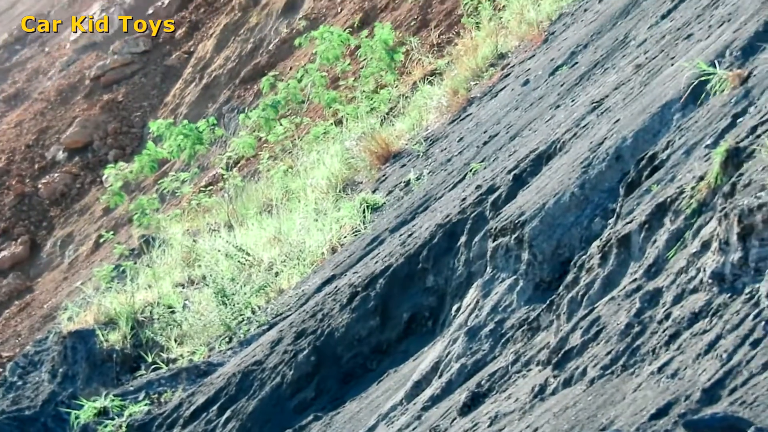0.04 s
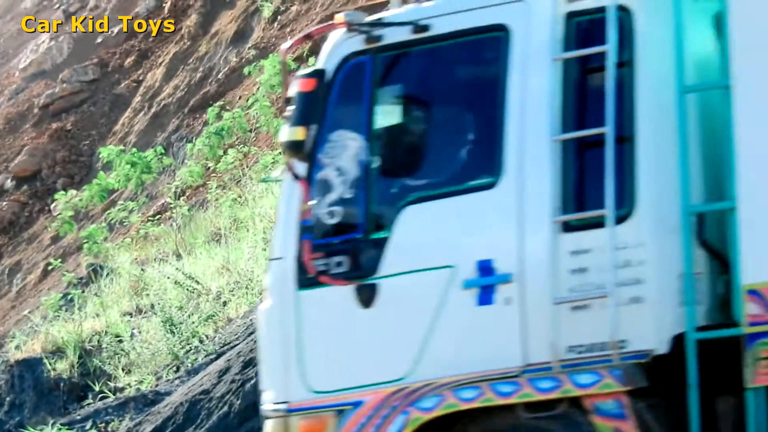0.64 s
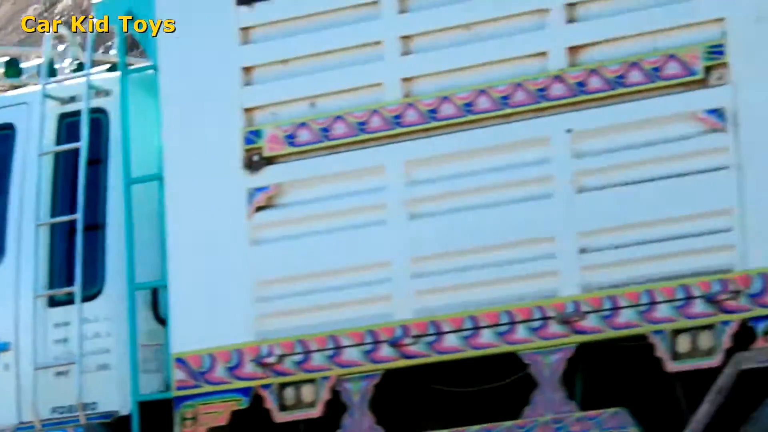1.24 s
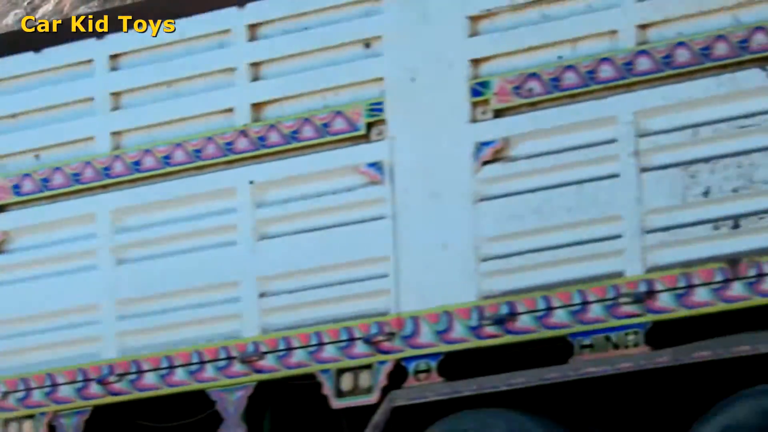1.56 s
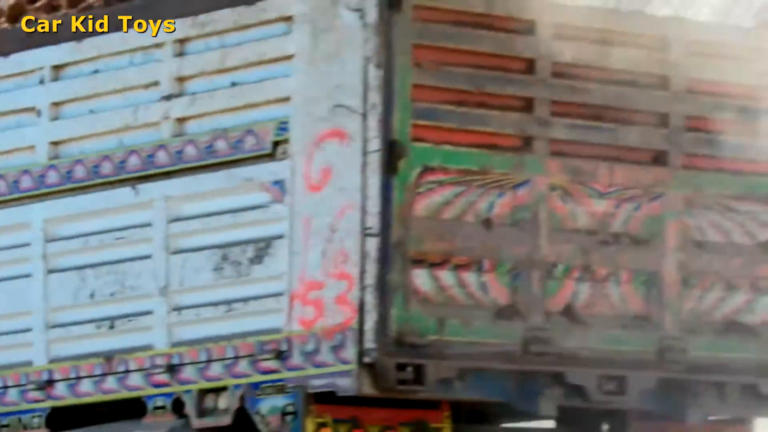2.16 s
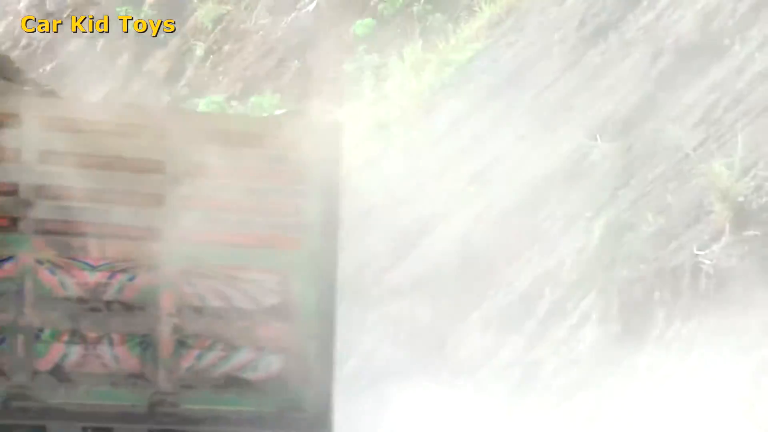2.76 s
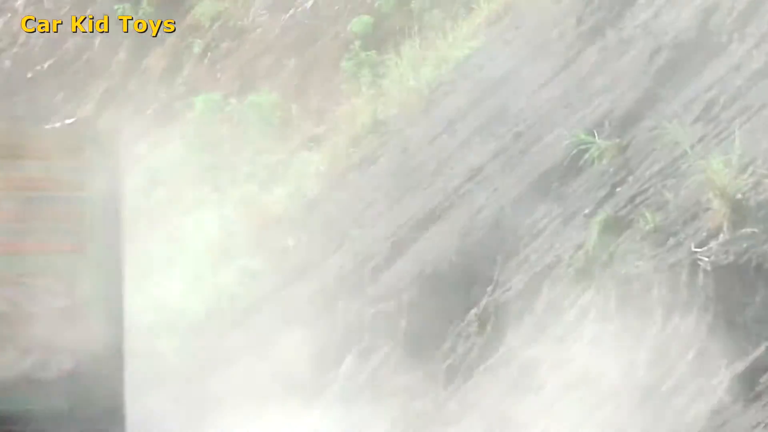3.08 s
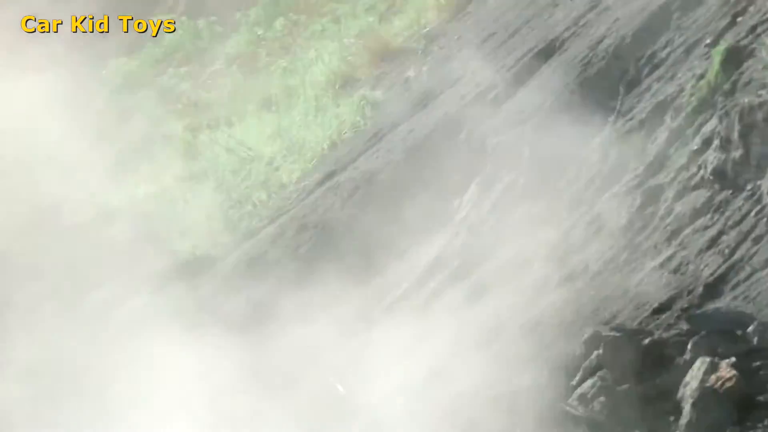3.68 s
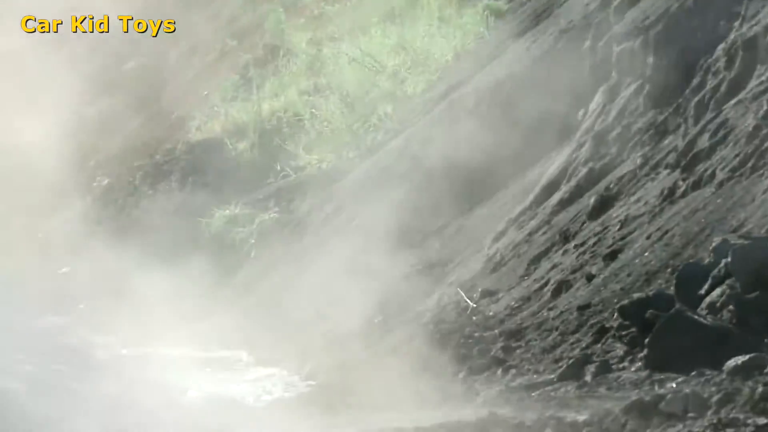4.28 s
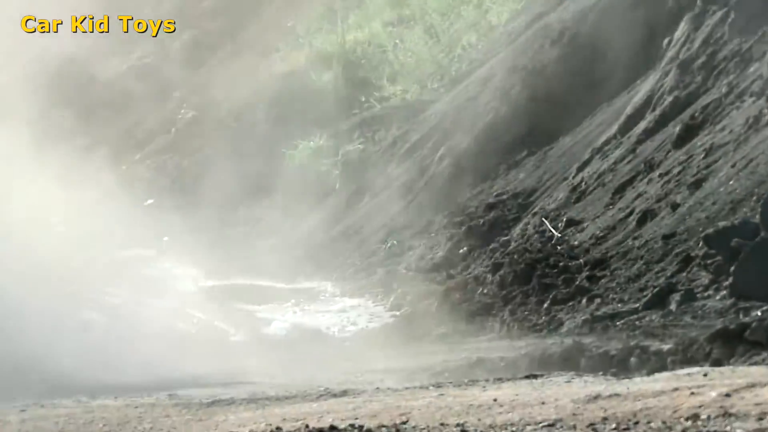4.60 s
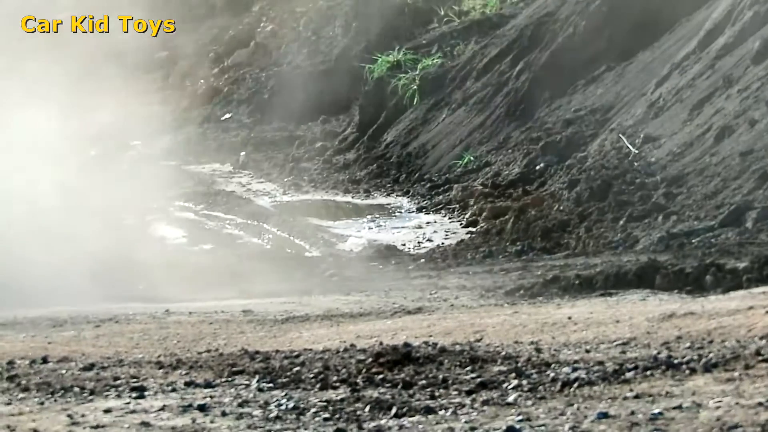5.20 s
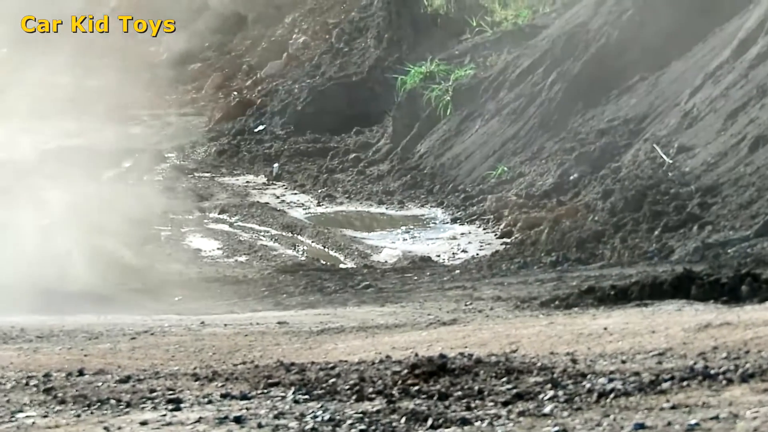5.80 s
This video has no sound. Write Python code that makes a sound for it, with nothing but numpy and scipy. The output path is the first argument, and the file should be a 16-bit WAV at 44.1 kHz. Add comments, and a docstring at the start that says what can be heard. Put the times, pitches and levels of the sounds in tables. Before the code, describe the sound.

Wind thumps the microphone as a big truck drones by over stones and grit, its body rattling, before receding with faintly squealing brakes.

```python
"""Rough earth road: a heavy diesel truck passes close by, its cargo body clanking over the ruts.
Firings ring the exhaust pipe, tyres crush stones and grit, loose parts tap the chassis.
Gusts buffet two microphone ports; the hardest thumps push a limiter down, and it recovers slowly.
As the truck draws away its tailpipe faces the listener; dry springs squeak, the engine sags and
picks up, the brake drums sing thinly."""
import sys
import numpy as np
from scipy import signal
from scipy.fft import rfft, irfft
from scipy.io import wavfile
from scipy.ndimage import uniform_filter1d, minimum_filter1d

SR = 44100
rng = np.random.default_rng(int(sys.argv[2]) if len(sys.argv) > 2 else 0)


def store_pcm(level_fs):
    """Save levels as 16-bit WAV."""
    pcm = np.round(np.clip(level_fs, -1, 1) * 32767).astype(np.int16)
    wavfile.write(sys.argv[1], SR, np.atleast_2d(pcm).T)


N = 257544
T = np.arange(N) / SR
HZ = np.fft.rfftfreq(N, 1 / SR)
TRUCK_SIDE_DB = -0.3  # side: left minus right

# Engine run. Each row: time in seconds, firing rate in Hz, throttle in dB.
ENGINE_RUN = [(0.0, 68.46, -2), (0.41, 70.63, 0.5), (0.71, 68.3, -1), (0.86, 62.28, 4), (1.2, 75.4, -1.5),
              (2.05, 71.46, -1), (2.39, 78, 1), (2.55, 76, -3), (2.85, 78.9, 0), (3.15, 77.6, -1),
              (3.4, 74.83, 0), (3.6, 75.48, 1.5), (3.85, 77.97, 0.5), (4.1, 80.7, -2.5), (4.5, 81.06, -2.5),
              (4.88, 80.34, 0.5), (5.04, 74.7, 0), (5.16, 63.55, -3), (5.32, 59.99, -1), (5.5, 65.15, 1),
              (5.62, 69.6, -0.5), (5.84, 74.3, 0)]
# Exhaust orders; the sixths come from unequal cylinders.
# Each row: multiple of the firing rate, level in dB, change under load in dB.
EXHAUST_ORDERS = [(4 / 6, -27, 0), (1, 0, -1.096), (8 / 6, -12.5, -2), (10 / 6, -18.5, 0),
                  (11 / 6, -12.5, -2.4), (2, -4, 0.9), (13 / 6, -13.5, -1), (15 / 6, -25, 0),
                  (16 / 6, -19.5, 0), (2.7, -24.5, 0), (20 / 6, -24, -3)]
# Exhaust pipe resonances. Each row: frequency in Hz, width in Hz, gain in dB.
PIPE_MODES = [(166.8, 35, 0.5), (255.4, 28.4, -2), (340, 60, -7.5), (480, 100, -16)]
# Exhaust rumble. Each row: frequency in Hz, relative density in dB.
RUMBLE_SPECTRUM = [(20, -42), (45, -15), (70, -0.5), (130, 10), (180, 4.5), (250, -3), (400, -20.5),
                   (800, -57), (2000, -43)]
# Engine block clatter. Each row: frequency in Hz, relative density in dB.
CLATTER_SPECTRUM = [(100, -8.5), (250, 8), (400, -0.5), (600, -7), (780, -1), (950, -1.5), (1150, -6),
                    (1400, -16), (2000, -13), (4000, -39), (12000, -76)]
# Stones under the tyres. Each row: frequency in Hz, relative density in dB.
STONE_SPECTRUM = [(300, 1.5), (480, 6.5), (600, 3.5), (1050, -4), (1380, 4), (1900, -2.5), (2400, -2),
                  (3000, -7), (3700, -14.5), (6000, -18), (12000, -73)]
# Fine grit under the tyres. Each row: frequency in Hz, relative density in dB.
GRIT_SPECTRUM = [(500, -17), (2000, 1), (3200, -4), (4000, -2.5), (5200, -0.5), (7000, -2), (8300, 2),
                 (9400, 1.5), (10200, -5.5), (11200, -12), (12000, -35), (14000, -36), (15500, -55)]
# Loose gravel. Each row: middle in seconds, length in seconds, grit change in dB, stone change in dB.
GRAVEL_PATCHES = [(0.316, 0.084, 5.5, 3), (0.58, 0.11, 5, 1.8), (0.761, 0.025, 4.5, -2),
                  (1.012, 0.13, 7, -5), (1.455, 0.11, 4.5, 6.5), (3.786, 0.3, 1, 5), (4.18, 0.28, 0.5, 1),
                  (5.18, 0.021, 6, 2), (5.704, 0.21, 7.5, -5)]
# Wind rumble. Each row: frequency in Hz, relative density in dB.
WIND_SPECTRUM = [(15, -37), (35, -11), (70, -3), (115, 0.5), (160, -1.5), (210, -6.5), (280, -23),
                 (520, -37.5), (800, -60), (2000, -70), (8000, -84)]
# Flapping of strong wind lumps. Each row: frequency in Hz, relative density in dB.
FLAP_SPECTRUM = [(100, -13), (220, 3), (330, 6.5), (500, -6.5), (800, -18.5), (2000, -38), (8000, -76)]
# Gusts at the ports. Each row: start in seconds, length in seconds, level in dB, side in dB.
PORT_GUSTS = [(0.042, 0.045, -22, -15), (0.286, 0.15, -15, 5), (0.491, 0.067, -15.5, -1),
              (0.655, 0.46, -18.5, -0.5), (1.1, 0.37, -15, 1.5), (1.499, 0.096, -14, 0.5),
              (1.714, 0.053, -14, -0.5), (1.842, 0.038, -15.5, -10), (2.028, 0.15, -15, 19),
              (2.426, 0.089, -16, -2.5), (2.59, 0.2, -29.5, 9), (3.6, 0.24, -30, 2),
              (3.871, 0.17, -17, -1.5), (4.082, 0.16, -18, 4.5), (4.34, 0.12, -25, 9),
              (5.66, 0.035, -16.5, 8)]
# Eddies striking a port. Each row: time in seconds, swing in dB, tip crack in dB, pitch in Hz, side in dB.
EDDY_STRIKES = [(.069, -1.5, -30, 161, 35), (.334, -6.5, -34, 159, -8), (0.551, -0.5, -19, 133, 30),
                (0.832, -2, -33, 143, -18), (.869, -1, -2, 146, -28), (.92, 0, -30, 160, 8),
                (1.009, -1, -23, 156, 8), (1.353, 1, -36, 119, 11), (1.377, 3.5, -28, 117, -21),
                (1.478, 0, -19, 168, 26), (1.531, -3.5, -2.5, 172, 8.5), (1.612, -0.5, -11, 144, 40),
                (1.92, 0, 0.5, 140.9, -6.5), (2.042, -2.5, -28, 180.3, -17), (2.083, 4.5, 5.5, 192, -13),
                (2.501, -5, -36.5, 127.9, 4), (2.592, -2, -36, 148, -32), (4.01, -3.5, -30, 184, 29),
                (4.12, -0.5, -27, 143, 30), (4.191, -8.5, -43, 125.5, -4), (4.435, -1.5, -1, 166, 38),
                (5.687, 2, -35, 136.9, 9)]
# Cargo body clanks. Each row: start in seconds, rattle level in dB, rattle lag in seconds,
# knock level in dB, knock pitch ratio, rattle T60 in seconds, side in dB.
BODY_CLANKS = [(0.366, -19, 0.0086, -19.5, 0.96, 0.088, -4),
               (1.29, -24.5, 0.0092, -22.5, 0.88, 0.093, -1.5),
               (1.71, -24.5, 0.009, -24.5, 0.87, 0.096, -1), (2.383, -26, 0.011, -37, 0.99, 0.072, -0.5)]
# Latch knock. Each row: delay in seconds, base frequency in Hz, width in Hz, gain in dB.
LATCH_MODES = [(0, 3240, 334, -1), (.002, 1740, 303, -1.5), (.005, 840, 250, -29)]
# Steel clashing on steel. Each row: frequency in Hz, relative density in dB.
CLASH_SPECTRUM = [(700, -18), (1400, -0.5), (3000, -4.5), (3700, -4.5), (5000, 0.5), (7000, -2),
                  (9500, 0.5), (11000, -5), (13200, -16.5), (14500, -36)]
# Loose steel fittings. Each row: frequency in Hz, width in Hz, gain in dB.
STEEL_MODES = [(1420, 90, 4), (1680, 150, 2), (2210, 43, 11.5), (2540, 50, 2), (3075, 29, 15.5),
               (4220, 60, 9.5), (4440, 39, 7), (4890, 50, 3.5), (5140, 54, 5), (5550, 65, 2),
               (6670, 55, 8.5), (7920, 58, 6), (8870, 100, 4), (9750, 170, 2), (10900, 140, -10)]
# Jolts over ruts. Each row: start in seconds, level in dB, plank pitch in Hz.
RUT_JOLTS = [(0.15, -36, 715), (0.335, -32, 614), (0.445, -40, 689), (0.55, -25, 433), (0.826, -36, 480),
             (1.008, -15.5, 407), (1.104, -26, 390), (1.43, -33, 327), (1.522, -29, 409),
             (1.848, -33, 956.5), (1.879, -38, 603), (2.165, -27, 329.4), (2.534, -37, 1000),
             (2.755, -37, 745), (3.785, -32.5, 920), (4.007, -22.5, 340), (4.032, -38, 814),
             (4.117, -30, 400), (5.228, -38, 1180)]
# Spring squeaks. Each row: start in seconds, length in seconds, start, peak and end pitch in Hz,
# level in dB, roughness as a fraction of pitch, relative octave level in dB.
SPRING_SQUEAKS = [(1.668, 0.092, 3910, 3720, 3600, -38.5, 0.028, 2),
                  (2.716, 0.061, 3280, 3820, 3840, -32, 0.02, -14),
                  (5.033, 0.1, 3870, 3700, 3487, -51, 0.015, 5.5)]
# Scrape of the spring leaves. Each row: frequency in Hz, relative density in dB.
SCRAPE_SPECTRUM = [(600, -20), (1600, 2), (3000, -10), (5000, -14), (10000, -25)]
# Spells of one brake drum mode. Each row: start in seconds, end in seconds, pitch in Hz, level in dB.
DRUM_SQUEALS = [(2.95, 3.553, 623, -42.5), (4.336, 4.574, 5870, -52), (4.9, 5.124, 5860, -52.5),
                (5.414, 5.492, 2790, -39), (5.475, 5.618, 2800, -41.5), (5.628, 5.721, 2800, -40),
                (5.434, 5.544, 4420, -41), (5.417, 5.509, 4130, -51), (5.45, 5.53, 5507, -51),
                (5.497, 5.56, 8100, -49), (5.537, 5.614, 6250, -40), (5.621, 5.78, 6270, -40),
                (5.62, 5.71, 7200, -47), (5.73, 5.82, 3390, -45.5), (5.73, 5.8, 8020, -52),
                (5.775, 5.89, 6035, -42), (5.813, 5.89, 2430, -36.5)]
# Rattling chassis parts. Each row: frequency in Hz, width in Hz, relative level in dB.
CHASSIS_MODES = [(519, 33, 3), (633, 33, 5), (714, 66, -1), (954, 31, 0), (1316, 57, -1.5), (1576, 60, -3),
                 (2290, 53, -6.5), (2973, 36, -9)]
# Likeness of the two ports. Each row: frequency in Hz, left-right correlation.
PORT_CORRELATION = [(60, 0.99), (350, 0.6), (900, 0.87), (2300, 0.78), (4200, 0.63), (8000, 0.53),
                    (14000, 0.14)]


def engine(jitter=0.012, uneven_db=4.0, rumble_db=-15, stumble_db=2.0,
           front_db=-26, rear_db=-20, tail_passes_s=2.42, tail_swing_s=1):
    """Exhaust drone, puffs and rumble, louder as the tailpipe swings round, plus block clatter."""
    firing_hz, throttle_db = curves(ENGINE_RUN)
    rear = (1 + np.tanh((T - tail_passes_s) / tail_swing_s)) / 2
    exhaust_db = front_db + (rear_db - front_db) * rear + throttle_db
    firings = np.cumsum(firing_hz * (1 + jitter * wander(27.4)[0])) / SR
    drone = 0
    for order, db, load_db in EXHAUST_ORDERS:
        sway_db = 0 if order == 1 else uneven_db
        order_db = db + load_db * braking() + sway_db * wander(9.0)
        drone = drone + amp(order_db) * np.cos(2 * np.pi * (order * firings + rng.random()))
    chug_db = (0.04 + 2.5 * braking()) * np.cos(2 * np.pi * firings / 3)  # every third firing is stronger
    chug = amp(chug_db + stumble_db * np.tanh(wander(62)[0]))
    rumble = colour(ports(noise()), RUMBLE_SPECTRUM)
    exhaust = unit(drone * chug) + puffs(firings) + amp(rumble_db) * rumble
    return amp(exhaust_db) * exhaust + clatter(firings)


def puffs(firings, level_db=-13.5, distance_share=0.46, uneven_db=3, gas_db=-4, gas_decay_firings=0.63):
    """Each firing rings the exhaust pipe with an uneven pulse and a rush of gas."""
    strength = amp(uneven_db * np.clip(rng.standard_normal(N), -2, 2))
    pulses = np.diff(np.floor(firings), prepend=0) * strength
    gas = rng.standard_normal(N) * np.exp(-(firings % 1) / gas_decay_firings)
    drive = unit(pulses) + amp(gas_db) * unit(gas)
    pipe = sum(amp(db) * resonance(hz, width_hz) for hz, width_hz, db in PIPE_MODES)
    return amp(level_db + distance_share * nearness_db()) * unit(irfft(rfft(drive) * pipe, N))


def clatter(firings, level_db=-36, labour_db=6.0, distance_share=0.53, knock_depth=0.13,
            pull_db=3, pull_s=5.4, pull_length_s=0.22):
    """The block: a six-firing growl and loose noise, pulsing per firing, harder as the engine pulls."""
    cycle = rng.standard_normal(512)
    growl = np.interp(firings / 6, np.arange(len(cycle)) / len(cycle), cycle, period=1)
    loose = ports(noise())
    pulsing = unit((1 + knock_depth * np.cos(2 * np.pi * firings)) * amp(wander(29)))
    block = unit(colour(growl * pulsing, CLATTER_SPECTRUM) + colour(loose * pulsing, CLATTER_SPECTRUM))
    load_db = labour_db * braking() + pull_db * bump(pull_s, pull_length_s)
    return amp(level_db + distance_share * nearness_db() + load_db) * pan(TRUCK_SIDE_DB) * block


def tyres(stones_db=-37.5, grit_db=-41.0, stones_scrub_db=4.3, grit_scrub_db=8, scrub_top_hz=8300):
    """Stones crunch and grit hisses under the wheels, shifting in loose gravel, louder under braking."""
    road_db = nearness_db() + 0.5 * wander(7.0)  # ruts
    crunch_db = stones_db + road_db + stones_scrub_db * braking()
    hiss_db = grit_db + road_db + grit_scrub_db * braking()
    for s, length_s, grit_change_db, stone_change_db in GRAVEL_PATCHES:
        patch = bump(s, length_s)
        hiss_db += grit_change_db * patch
        crunch_db += stone_change_db * patch
    stones = amp(crunch_db) * crush(STONE_SPECTRUM, per_s=500, size_db=-18, grain_db=-9.5, flutter_db=1)
    grit = amp(hiss_db) * crush(GRIT_SPECTRUM, per_s=1600, size_db=0.5, grain_db=-5, flutter_db=0.97)
    scrub = irfft(rfft(grit) / np.sqrt(1 + (HZ / scrub_top_hz) ** 8), N)  # duller than rolling
    return pan(TRUCK_SIDE_DB) * (stones + grit + braking() * (scrub - grit))


def crush(spectrum, per_s, size_db, grain_db, flutter_db):
    """Crushed ground: a fluttering hiss with tiny cracks in it."""
    cracks = noise() * impacts(per_s, size_db, cap=4)
    flutter = amp(flutter_db * wander(44))
    return flutter * colour(ports(noise() + amp(grain_db) * unit(cracks)), spectrum)


def wind(lump_db=3, swirl_db=4, flap_db=-16.0, flap_growth=3.3):
    """Lumpy turbulence, different at each port; small eddies saturate, large ones thump."""
    swirl = pan(swirl_db * wander(5.5)[0])
    lumps = unit(amp(lump_db * np.minimum(wander(47.0, channels=2), 2)))
    force = airflow() * swirl * lumps
    rumble = force * colour(noise(), WIND_SPECTRUM)
    flap = colour(force ** flap_growth * noise(), FLAP_SPECTRUM)  # stronger lumps are brighter
    thumps, calm = eddies()
    buffet = rumble + amp(flap_db) * rumble.std() * flap
    return calm * np.tanh(buffet) + thumps


def airflow(draught_db=-20, draught_side_db=3, attack_s=0.014, release_s=0.062):
    """Wind strength per port: the truck's draught plus gusts that rise, hold and die away."""
    power = (amp(draught_db + nearness_db()) * pan(draught_side_db)) ** 2
    for s, length_s, db, side_db in PORT_GUSTS:
        gust = np.clip((T - s) / attack_s, 0, 1) * np.exp(-np.maximum(T - s - length_s, 0) / release_s)
        power += (amp(db) * pan(side_db) * gust) ** 2
    return np.sqrt(power)


def eddies(width_s=0.0032, tip_width_s=0.00044, tick_db=-24):
    """Each large eddy gives one sharp swing and displaces the small ones while it lasts."""
    thumps, calm = np.zeros((2, N)), np.ones((2, N))
    t = np.arange(-SR // 40, SR // 40) / SR
    eddy = np.exp(-abs(t) / width_s)
    tip = 1 / np.cosh(t / tip_width_s) + amp(tick_db) * np.exp(-abs(t) * SR)  # blunt spike, faint tick
    for s, db, tip_db, hz, side_db in EDDY_STRIKES:
        lean = pan(side_db) / pan(side_db).max()
        swing = amp(db) * eddy * np.cos(2 * np.pi * hz * t)
        add(thumps, s + t[0], lean * (swing + amp(tip_db) * tip))
        add(calm, s + t[0], -lean * eddy)
    return thumps, calm


def clanks(knock_peak_s=0.0033, rise_s=0.0021, chatter_db=4.0, steel_db=-3, snap=1.45):
    """A latch knocks, then the loose steel around it clashes raggedly, snaps off and rings briefly."""
    out, t = np.zeros((2, N)), T[:SR // 4]
    contact = ports(noise() * amp(chatter_db * np.tanh(wander(250))))
    clash, contact_bins = colour(contact, CLASH_SPECTRUM), rfft(contact)
    steel = sum(amp(db) * width_hz * ring(t, hz, width_hz, rng.random())
                for hz, width_hz, db in STEEL_MODES)
    blow = t / knock_peak_s * np.exp(1 - t / knock_peak_s)
    for s, db, lag_s, knock_db, ratio, t60_s, side_db in BODY_CLANKS:
        now = slice(round(s * SR), round(s * SR) + len(t))
        for delay_s, hz, width_hz, mode_db in LATCH_MODES:
            knock = unit(irfft(contact_bins * resonance(ratio * hz, 2 * width_hz), N))
            add(out, s + delay_s, amp(knock_db + mode_db) * pan(side_db) * burst(blow, knock[:, now]))
        envelope = amp(db - 60 * (t / t60_s) ** snap) * (1 - np.exp(-t / rise_s))
        rattle = burst(envelope, clash[:, now])
        ringing = rattle.std() * unit(signal.fftconvolve(rattle, steel[None], axes=1)[:, :len(t)])
        add(out, s + lag_s, amp(steel_db) * pan(side_db) * (rattle + ringing))
    return out


def jolts(width_hz=300, rise_s=0.0016, t60_s=0.099):
    """Ruts jolt the wooden cargo body: short, dull booms of the planks."""
    out, t = np.zeros((2, N)), T[:SR // 4]
    contact_bins = rfft(ports(noise()))
    for s, db, hz in RUT_JOLTS:
        plank = unit(irfft(contact_bins * resonance(hz, width_hz), N))
        envelope = amp(db - 60 * t / t60_s) * (1 - np.exp(-t / rise_s))
        add(out, s, burst(envelope, plank[:, round(s * SR):][:, :len(t)]))
    return out


def springs(skew=0.62, scrape_db=-9):
    """Dry leaf springs rub: short raspy squeaks of bending pitch over a dull scrape."""
    out = np.zeros((2, N))
    scrape = colour(ports(noise()), SCRAPE_SPECTRUM)
    for s, length_s, *path_hz, db, rough, octave_db in SPRING_SQUEAKS:
        slip = 2 * np.linspace(0, 1, int(length_s * SR)) ** skew  # 0 start, 1 peak, 2 end
        hz = np.interp(slip, range(len(path_hz)), path_hz)
        phase, swell = stick_slip(hz, rough, skew, sharpness=2.5, tremble_db=3.5)
        squeak = swell * (np.sin(phase) + amp(octave_db) * np.sin(2 * phase))
        rub = amp(scrape_db) * np.sin(np.pi * slip / 2) * scrape[:, :len(slip)]
        add(out, s, amp(db) * (squeak + rub))
    return out


def brakes(rough=0.0042, waver=0.00069, grain_db=-3):
    """Rubbed drums sing in shifting modes; each swells, breaks up and sinks back."""
    out = np.zeros((2, N))
    bend = 1 + waver * wander(18)[0]
    grain = 1 + amp(grain_db) * wander(230, channels=2)  # dust between shoe and drum
    for start_s, end_s, hz, db in DRUM_SQUEALS:
        now = (round(start_s * SR) + np.arange(int((end_s - start_s) * SR))) % N
        phase, swell = stick_slip(hz * bend[now], rough, skew=0.94, sharpness=0.75, tremble_db=5.0)
        tone = np.sin(phase + rng.uniform(-0.29, 1, (2, 1)))  # phase offset per port
        add(out, start_s, amp(db) * swell * unit(grain[:, now]) * tone)
    return out


def stick_slip(hz, rough, skew, sharpness, tremble_db):
    """Phase and swell of a friction tone that trembles, peaks and fades."""
    progress = np.linspace(0, 1, len(hz))
    phase = 2 * np.pi * np.cumsum(hz * (1 + rough * wander(570)[0, :len(hz)])) / SR
    arch = abs(np.sin(np.pi * progress ** skew)) ** sharpness
    tremble = unit(amp(tremble_db * np.tanh(wander(69)[0, :len(hz)])))
    return phase, arch * tremble


def chassis(level_db=-39, per_s=22, size_db=4, distance_share=1.48):
    """Stones and loose parts tap the chassis at random; each part rings at its own pitch."""
    out, t = np.zeros((2, N)), T[:SR // 10]
    for hz, width_hz, db in CHASSIS_MODES:
        taps = impacts(per_s, size_db, cap=2.5) * pan(3 * rng.standard_normal(N))
        out += amp(db) * unit(signal.oaconvolve(taps, ring(t, hz, width_hz)[None], axes=1)[:, :N])
    return amp(level_db + distance_share * nearness_db()) * unit(out)


def nearness_db(abreast_s=0.89, nearest_m=3.79, speed_m_per_s=3.45):
    """Spreading loss of the passing truck, 0 dB when abreast."""
    return -20 * np.log10(np.hypot(1, speed_m_per_s * (T - abreast_s) / nearest_m))


def braking(start_s=4.963, rise_s=0.38):
    """Brake load, 0 to 1: the tyres scrub and the engine labours."""
    return np.clip((T - start_s) / rise_s, 0, 1)


def amp(db):
    """Decibels to gain."""
    return 10 ** (np.asarray(db) / 20)


def unit(x):
    """Scales to rms 1."""
    return x / np.sqrt(np.mean(x ** 2) + 1e-20)


def noise():
    """Two unrelated white noises."""
    return rng.standard_normal((2, N))


def wander(rate_hz, channels=1):
    """Random drift of rms 1, up to about rate_hz."""
    return unit(irfft(rfft(rng.standard_normal((channels, N))) * np.exp(-(HZ / rate_hz) ** 2), N))


def impacts(per_s, size_db, cap):
    """Random impulses, each between 0 and cap * size_db in level."""
    return amp(size_db * np.minimum(rng.exponential(1, N), cap)) * (rng.random(N) < per_s / SR)


def bump(middle_s, length_s):
    """Gaussian swell of height 1."""
    return np.exp(-(2 * (T - middle_s) / length_s) ** 2)


def burst(envelope, x):
    """Noise under an envelope, with the energy of that envelope."""
    return unit(envelope * x) * np.sqrt(np.mean(envelope ** 2))


def resonance(hz, width_hz):
    """Double-pole response; width at -6 dB."""
    return 1 / (1 + 2j * (HZ - hz) / width_hz) ** 2


def ring(t, hz, width_hz, phase_turns=0):
    """Decaying sine of a struck mode."""
    return np.exp(-np.pi * width_hz * t) * np.sin(2 * np.pi * (hz * t + phase_turns))


def curves(rows):
    """Each column of a time table, per sample."""
    s, *columns = np.transpose(rows)
    return [np.interp(T, s, column) for column in columns]


def across(rows):
    """A frequency table read at every bin."""
    hz, value = np.transpose(rows)
    return np.interp(np.log(HZ + 1), np.log(hz), value)


def colour(x, spectrum):
    """Filters x by a spectrum, at rms 1."""
    return unit(irfft(rfft(x) * amp(across(spectrum)), N))


def ports(pair):
    """Blends two unrelated signals into left and right: alike in the bass, looser in the treble."""
    likeness = across(PORT_CORRELATION)
    mid, side = rfft(pair) * np.sqrt([1 + likeness, 1 - likeness])
    return irfft(np.array([mid + side, mid - side]), N)


def pan(side_db):
    """Left and right gains of mean power 1."""
    gains = amp(np.array([side_db, -side_db]) / 2).reshape(2, -1)
    return gains / np.sqrt(np.mean(gains ** 2, axis=0))


def add(mix, start_s, sound):
    """Lays a sound into the mix."""
    part = mix[:, max(round(start_s * SR), 0):][:, :sound.shape[-1]]
    part += sound[..., :part.shape[1]]


def limiter(x, recovery_db_per_s=5.5, smooth_samples=32):
    """Pulls both channels down when a peak passes full scale, then lets them up slowly."""
    over_db = 20 * np.log10(np.maximum(abs(x).max(0), 1))
    recovered_db = recovery_db_per_s * T
    held_db = np.maximum.accumulate(over_db + recovered_db) - recovered_db
    return x * amp(uniform_filter1d(minimum_filter1d(-held_db, smooth_samples), smooth_samples))


def scene():
    """The truck and the wind."""
    return engine() + tyres() + chassis() + wind() + jolts() + clanks() + springs() + brakes()


def record(dry):
    """Limiter, then low-pass."""
    lowpass = signal.firwin(511, cutoff=15100, window=("kaiser", 9), fs=SR)
    return signal.oaconvolve(limiter(dry), lowpass[None], "same")


dry = scene()
out = record(dry)
store_pcm(out)
```